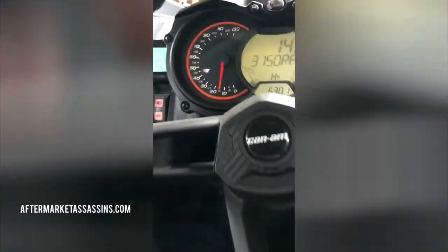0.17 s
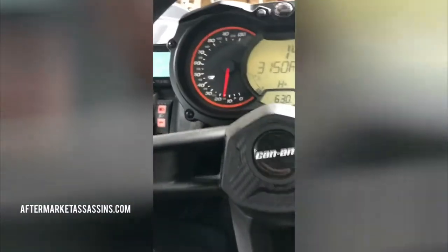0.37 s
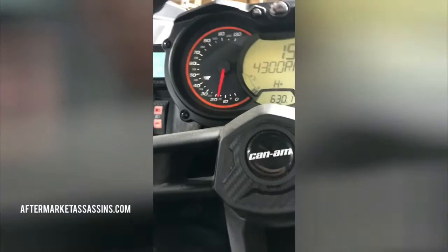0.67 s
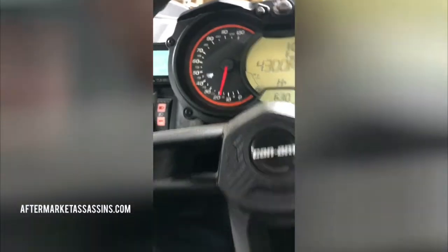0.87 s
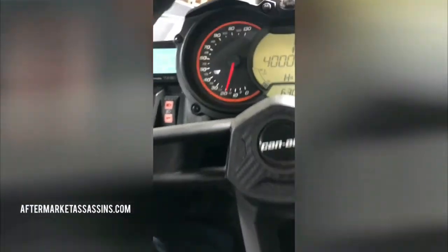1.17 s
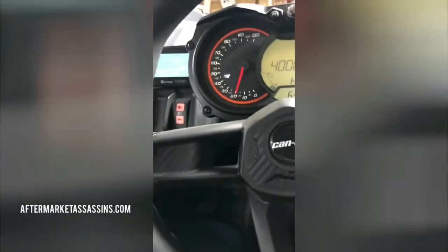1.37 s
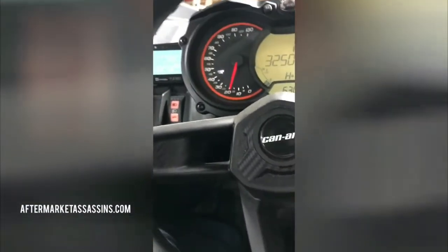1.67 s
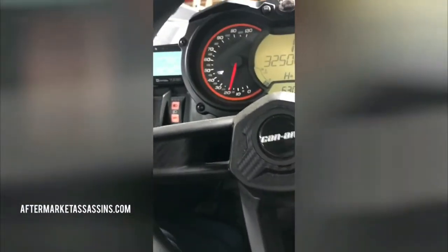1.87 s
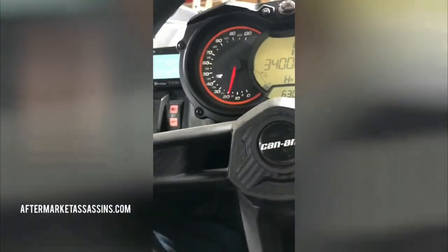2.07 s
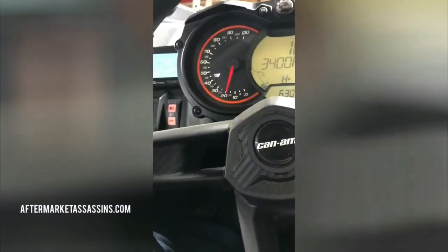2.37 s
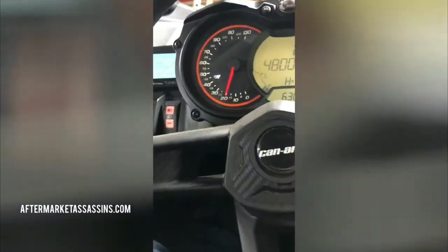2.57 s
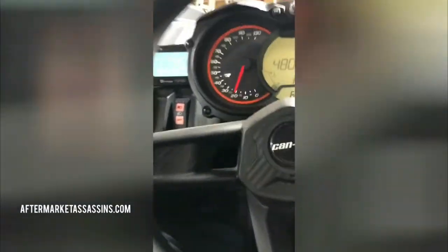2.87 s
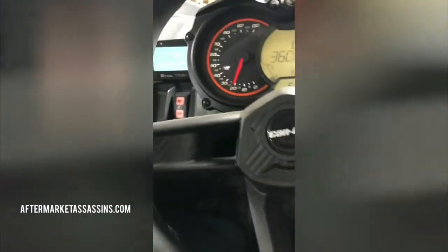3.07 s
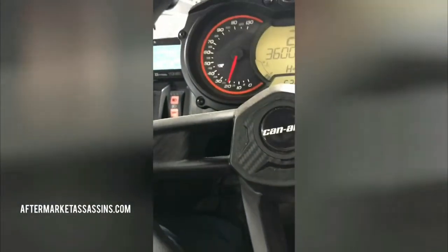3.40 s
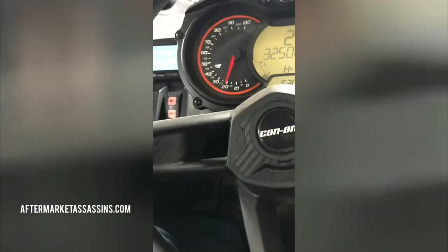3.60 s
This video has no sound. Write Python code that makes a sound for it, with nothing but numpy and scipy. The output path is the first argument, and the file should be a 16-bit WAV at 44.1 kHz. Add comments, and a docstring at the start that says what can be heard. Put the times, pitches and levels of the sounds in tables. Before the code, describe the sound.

A turbocharged buggy engine is heard close up from the driver's seat, revving up from the start with an intake roar and a faint whistle. At about 0.7 seconds it stumbles, releases a short hiss of air and falls to a low drone. It climbs again from 1.8 seconds, with another air burst at 2.5, then drones lower until about 3.7 seconds. Drivetrain noise runs underneath throughout.

```python
"""In the driver's seat of a turbocharged three-cylinder buggy that accelerates and eases off twice.
Under load the exhaust harmonics sweep through pipe and cab resonances, the intake roars and the turbo
whistles faintly. At each lift the engine stumbles, the blow-off valve dumps its air, and a low drone
remains over a bed of drivetrain noise. Hard panels close to the seat colour the treble."""
import sys
import numpy as np
from scipy import signal
from scipy.fft import rfft, irfft
from scipy.io import wavfile

SR = 44100
rng = np.random.default_rng(int(sys.argv[2]) if len(sys.argv) > 2 else 0)


def master_out(mix):
    """Clip the mix to full scale and print it as 16-bit PCM to the path in sys.argv[1]."""
    frames = np.transpose(np.atleast_2d(mix))
    ceiling = np.clip(frames, -1, 1)
    pcm = np.round(ceiling * 32767).astype(np.int16)
    wavfile.write(sys.argv[1], SR, pcm)


N = 164934
T = np.arange(N) / SR
THROTTLE_S, FLUTTER_HZ = 0.023, 22.6
# bursts of throttle: (opens [s], shuts [s], relative blow-off level [dB])
PULLS = [(-.1, .695, -1), (1.779, 2.495, -0.5)]


def amp(db):
    """Decibels to gain."""
    return 10 ** (np.asarray(db) / 20)


def unit(x):
    """Scales to rms 1."""
    return x / np.sqrt(np.mean(x ** 2) + 1e-20)


def curve(points, at):
    """Reads a two-column table along straight lines."""
    return np.interp(at, *np.transpose(points))


def noise(spectrum):
    """Noise of rms 1 with the given colour."""
    hz, db = np.transpose(spectrum)
    f = np.fft.rfftfreq(N, 1 / SR)
    colour = amp(np.interp(np.log(f + 1), np.log(hz), db))
    return unit(irfft(rfft(rng.standard_normal(N)) * colour, N))


def wander(hz):
    """Random motion of rms 1, up to about the given rate."""
    f = np.fft.rfftfreq(N, 1 / SR)
    return unit(irfft(rfft(rng.standard_normal(N)) * np.exp(-(f / hz) ** 2), N))


def fuzzy_tone(hz, width_hz):
    """Narrow noise of rms 1 around a steady or moving pitch."""
    angle = 2 * np.pi * np.cumsum(hz * np.ones(N)) / SR
    return unit(wander(width_hz / 2) * np.cos(angle) + wander(width_hz / 2) * np.sin(angle))


def gate(start, end, edge):
    """One between two times, with smooth edges."""
    return np.sin(np.pi / 2 * np.clip(np.minimum(T - start, end - T) / edge + .5, 0, 1)) ** 2


def bell(centre_s, half_s):
    """A smooth swell around a time."""
    return np.exp(-((T - centre_s) / half_s) ** 2)


def drivetrain(angle):
    """A bed of belt, gear and tyre noise with a light engine throb and a faint, near-steady gear whine."""
    # colour of the rolling noise: (frequency [Hz], relative density [dB])
    colour = [(20, -32), (45, -16), (70, -15), (130, 5.5), (190, 1), (250, 11), (320, -4), (400, 3),
              (490, -3), (640, 5), (800, -1), (940, 4.5), (1080, 2), (1300, 2.5), (1720, -3.5), (2060, 1.5),
              (2400, -4), (3400, -2.5), (4300, -5.5), (4650, -5.5), (4900, -13), (5400, -10.5),
              (7200, -13.5), (7800, -18), (9600, -21), (10300, -26.5), (11200, -22.5), (15500, -29)]
    # its slow rise and fall: (time [s], relative level [dB])
    ride = [(0, -6.5), (.25, -2.5), (1, -1), (1.4, -1.5), (1.75, -0.5), (2.9, -0.5), (3.2, -2), (3.6, 0)]
    roll = noise(colour) * amp(-28 + curve(ride, T) + 0.32 * wander(hz=25))
    throb = 1 + 0.083 * np.cos(angle)
    whine = amp(-50.5) * bell(0, half_s=11) * fuzzy_tone(hz=1299, width_hz=52)
    return roll * throb + whine


def turbo():
    """A faint whistle that shoots upward as the boost builds."""
    # one whistle per pull: (loudest at [s], pitch there [Hz], relative level [dB])
    whistles = [(.51, 13900, -48.5), (2.3, 13900, -52)]
    climb_hz_per_s = 26000
    return sum(amp(db) * bell(at, half_s=0.078) * fuzzy_tone(hz + climb_hz_per_s * (T - at), width_hz=900)
               for at, hz, db in whistles)


def blow_off():
    """The valve cracks with a narrow spit, opens wide, and hisses away as the pressure drains."""
    # colour of the escaping air: (frequency [Hz], relative density [dB])
    hiss = [(300, 19), (600, -11.5), (930, 13), (1150, -3), (1450, 10), (1750, 3), (2080, 4), (2500, 2.5),
            (3150, 8), (3500, 4), (3900, 6.5), (4300, 1.5), (4650, 3.5), (4900, -0.5), (6300, 1),
            (6800, 0.5), (7350, 2), (7800, -1.5), (9300, 0), (10300, -5.5), (10750, -1), (11400, -4.5),
            (12700, -3.5), (14500, -6.5), (15600, -10.5)]
    # the housing rings as air passes: (frequency [Hz], width [Hz], level against the hiss [dB])
    rings = [(3737, 420, -17), (4640, 260, -15.5), (7530, 330, -23), (10800, 300, -25)]
    lead_s, rise_s, fall_db_per_s, crack_lead_s = 0.035, 0.085, 35, 0.0093
    out = np.zeros(N)
    for _, off, db in PULLS:
        age = T - off + lead_s
        flow = np.clip(age / rise_s, 0, 1) * amp(-fall_db_per_s * np.maximum(age - rise_s, 0))
        air = noise(hiss) + sum(amp(ring_db) * fuzzy_tone(hz, width) for hz, width, ring_db in rings)
        crack = bell(off - crack_lead_s, half_s=0.024) * fuzzy_tone(hz=6160, width_hz=1900)
        out += amp(db - 21) * flow * air + amp(db - 31.5) * crack
    return out


def intake(rate, angle):
    """Roar that pulses with the firings, grows with speed and dies after each lift."""
    # colour of intake and combustion: (frequency [Hz], relative density [dB])
    colour = [(30, -31), (90, 0), (300, 2), (490, -3.5), (620, 5), (780, 0), (950, -2), (1450, -1),
              (1720, -10), (1900, -4), (2040, 4.5), (2300, -5.5), (2600, -1), (3300, -11.5), (4800, -19),
              (5400, -15), (6800, -14), (7800, -20.5), (9500, -19.5), (10500, -23.5), (15500, -24.5)]
    # the roar builds with the revs: (firing rate [Hz], relative level [dB])
    build = [(77, -36), (85, -34), (92, -29.5), (103, -26.5), (112, -25), (123, -23.5)]
    release_s = 0.18
    opened = sum(np.clip((T - on) / THROTTLE_S, 0, 1) * np.exp(-np.maximum(T - off, 0) / release_s)
                 for on, off, _ in PULLS)
    throb = 1 + 0.13 * np.cos(angle)
    return opened * amp(curve(build, rate)) * noise(colour) * throb


def partial(angle, multiple, db, flutter_db=3):
    """One fluttering exhaust partial; the pipe delays high harmonics more than low ones."""
    dispersion_rad = 0.71
    phase = multiple * angle - dispersion_rad * multiple ** 2
    return np.sqrt(2) * amp(db + flutter_db * wander(FLUTTER_HZ)) * np.cos(phase)


def loaded_note(rate, angle):
    """On the throttle: five harmonics swell and dip through resonances, with faint overtones on top."""
    # exhaust tone across the revs: (firing rate [Hz], levels of harmonics 1 to 5 [dB])
    harmonics = [(78, -35, -22, -17, -35, -37.5), (80.4, -31, -19.5, -19.5, -38, -33),
                 (85.1, -25.5, -14, -20.5, -23.5, -32.5), (87, -13.5, -23, -28.5, -30, -34),
                 (96, -11.5, -30, -24, -34.5, -47.5), (100.6, -11.5, -28.5, -35, -24, -41),
                 (107.8, -15.5, -15, -29, -33.5, -70), (112.2, -7.5, -18, -19.5, -40, -39),
                 (118.7, -14, -10.5, -25.5, -41, -63), (119.4, -31.5, -10, -19.5, -65, -57),
                 (122.1, -15, -17, -21.5, -45, -37)]
    rates, *levels = np.transpose(harmonics)
    body = sum(partial(angle, k, np.interp(rate, rates, db), flutter_db=0.5)
               for k, db in enumerate(levels, 1))
    sixth_db, step_db = -46, 1.3
    return body + sum(partial(angle, k, sixth_db - step_db * (k - 6)) for k in range(6, 13))


def coasting_note(rate, angle):
    """Off the throttle: a nearly pure drone whose upper harmonics sweep through cab resonances."""
    # the fundamental swells and sags: (time [s], level [dB])
    swells = [(0.84, -11.5), (0.95, -14.5), (1.04, -10.0), (1.2, -15.5), (1.3, -14), (1.46, -18.5),
              (1.55, -17), (1.66, -17), (1.75, -11), (2.63, -11), (2.71, -11.5), (2.77, -17.1),
              (2.85, -10.0), (3.19, -16.5), (3.34, -15), (3.48, -19), (3.62, -15.5), (3.72, -16)]
    # soft overtones: (multiple of the firing rate, level [dB])
    overtones = [(2, -35.5), (3, -45.5)]
    # cab resonances: (frequency [Hz], width [Hz], peak level [dB])
    cab = [(356.8, 41.2, -39), (411, 17.6, -41.5), (576, 27, -45)]
    drone = partial(angle, 1, curve(swells, T), flutter_db=0.5)
    drone += sum(partial(angle, k, db) for k, db in overtones)
    for k in (4, 5):
        resonance = sum(amp(db) / (1 + (2 * (k * rate - hz) / width) ** 2) for hz, width, db in cab)
        drone += resonance * partial(angle, k, db=0)
    return drone


def exhaust(rate, angle):
    """The firing note: rich under load, pure when coasting, lumpy when a cylinder skips."""
    # skips as the throttle moves: (start [s], end [s], lump level [dB], share of steady note lost [0-1])
    skips = [(0.704, 0.815, 0.5, 0.78), (0.874, 0.951, -17, 0.07), (1.768, 1.866, -9, 0.12),
             (2.512, 2.619, 1, 0.99)]
    # lumpy tone of a skipped cylinder: (multiple of the engine cycle rate, relative level [dB])
    skip_partials = [(2, -18.5), (3, -30), (4, -19.5), (5, -56), (6, -29), (7, -27), (8, -45.5), (9, -40.5),
                     (10, -32), (11, -36)]
    # burble of unequal cylinders: (multiple of the engine cycle rate, level off throttle [dB])
    burble_partials = [(2, -37), (4, -41.5), (5, -51.5), (7, -47.5), (8, -49.5), (10, -58.5), (11, -54)]
    cylinders, skip_edge_s, burble_boost_db = 3, 0.03, 2.5
    load = sum(gate(on, off, THROTTLE_S) for on, off, _ in PULLS)
    stumble = sum(amp(db) * gate(start, end, skip_edge_s) for start, end, db, _ in skips)
    steady = 1 - sum(lost * gate(start, end, skip_edge_s) for start, end, _, lost in skips)
    note = load * loaded_note(rate, angle) + (1 - load) * coasting_note(rate, angle)
    lumps = sum(partial(angle, k / cylinders, db) for k, db in skip_partials)
    burble = sum(partial(angle, k / cylinders, db + burble_boost_db * load) for k, db in burble_partials)
    return steady * (note + burble) + stumble * lumps


def panels(x):
    """Short dense reflections off the dash and cage comb the treble."""
    echo_db, decay_s, low_cut_hz = -11, 0.04, 1600
    t = T[:SR // 8]
    low_cut = signal.butter(2, low_cut_hz, "high", fs=SR, output="sos")
    echo = signal.sosfilt(low_cut, rng.standard_normal(len(t))) * np.exp(-t / decay_s)
    return x + amp(echo_db) * signal.fftconvolve(x, echo / np.linalg.norm(echo))[:N]


def scene():
    """One slightly jittery engine speed drives exhaust, intake and drivetrain."""
    # the revs climb and fall twice: (time [s], firing rate [Hz])
    revs = [(0.0, 76.8), (0.1, 80.26), (0.19, 90.7), (0.33, 95.35), (0.46, 109.5), (0.65, 121.7),
            (0.7, 121.7), (0.75, 106.4), (0.85, 104.8), (1.0, 96.9), (1.12, 89.4), (1.35, 84.65),
            (1.48, 79.2), (1.6, 80.9), (1.7, 76.03), (1.85, 81.07), (2.0, 86.6), (2.15, 102.2),
            (2.32, 113.8), (2.45, 124.3), (2.5, 123.3), (2.56, 108.7), (2.7, 104.2), (2.88, 91.36),
            (3.05, 89.1), (3.2, 86.2), (3.45, 81.5), (3.74, 78.9)]
    rate = curve(revs, T)
    jitter = 1 + 0.007 * wander(FLUTTER_HZ)
    angle = 2 * np.pi * np.cumsum(rate * jitter) / SR  # one turn per firing
    rush = amp(-0.92) * panels(intake(rate, angle) + drivetrain(angle) + turbo() + blow_off())
    return (exhaust(rate, angle) + rush)[None]


def record(dry):
    """A steep high cut takes off the very top of the hiss."""
    cutoff_hz = 15780
    high_cut = signal.firwin(801, cutoff_hz, window=("kaiser", 9), fs=SR)
    return signal.oaconvolve(dry, high_cut[None], "same")


dry = scene()
out = record(dry)
master_out(out)
```